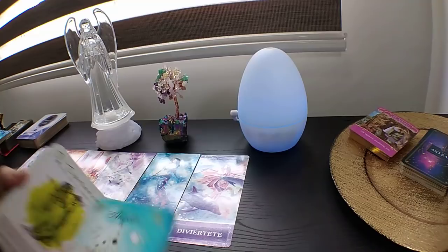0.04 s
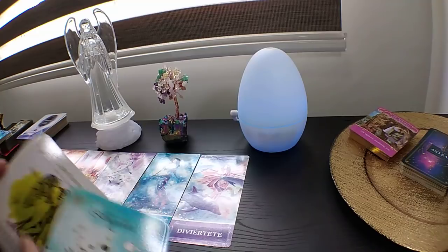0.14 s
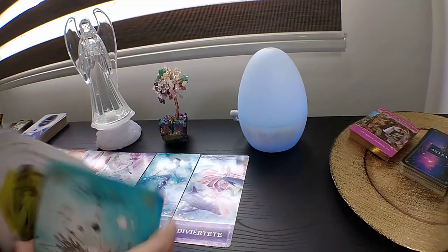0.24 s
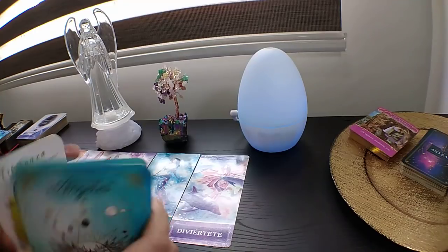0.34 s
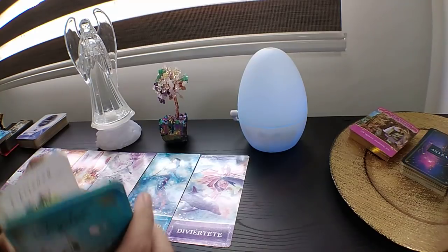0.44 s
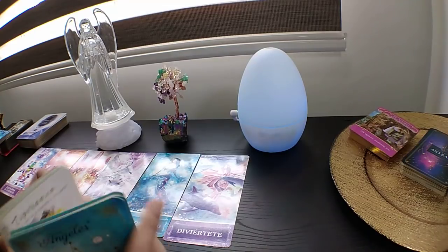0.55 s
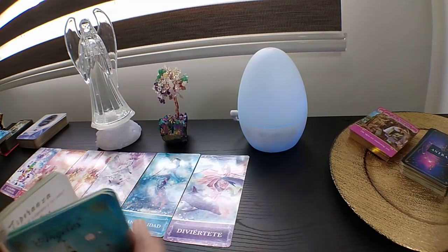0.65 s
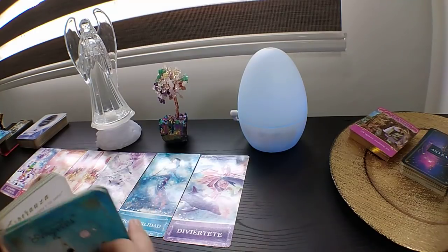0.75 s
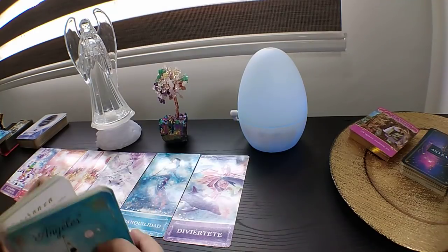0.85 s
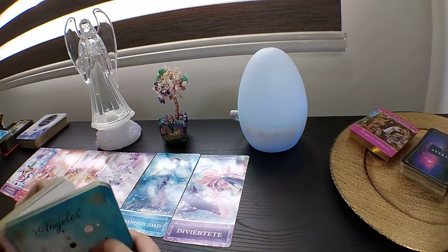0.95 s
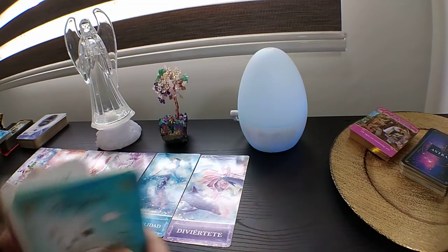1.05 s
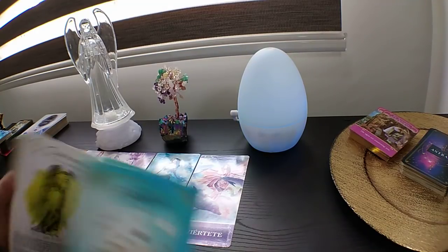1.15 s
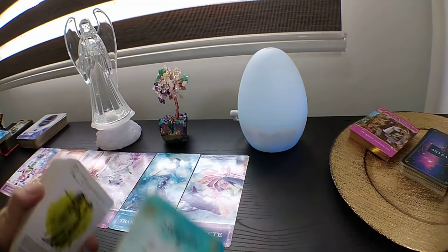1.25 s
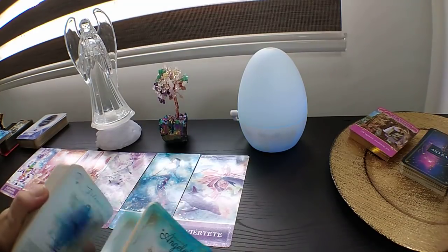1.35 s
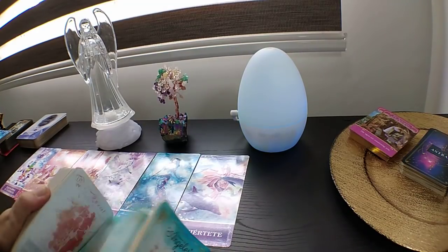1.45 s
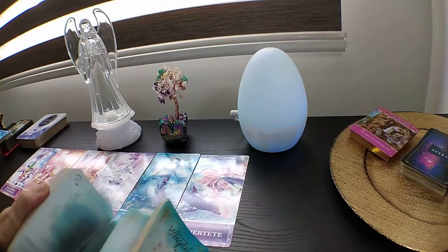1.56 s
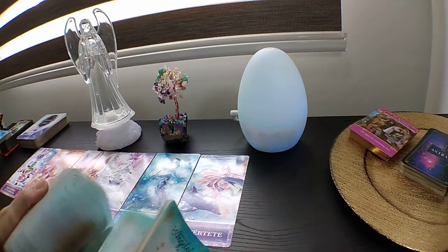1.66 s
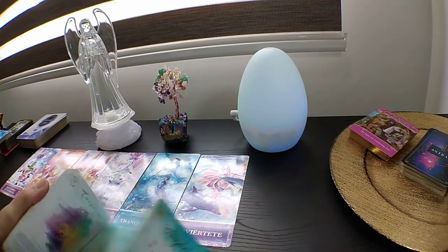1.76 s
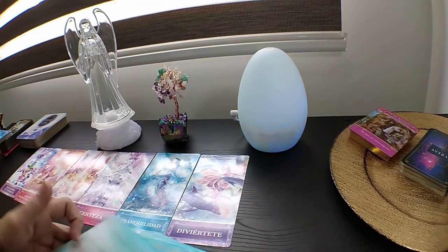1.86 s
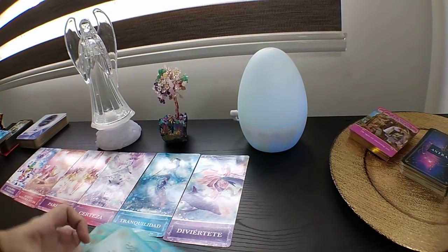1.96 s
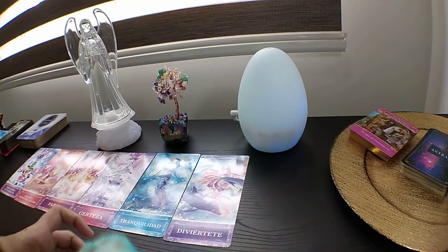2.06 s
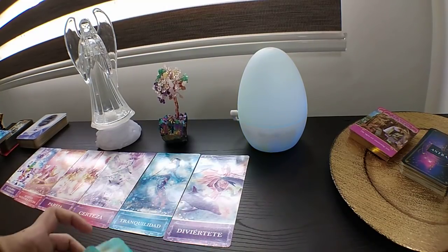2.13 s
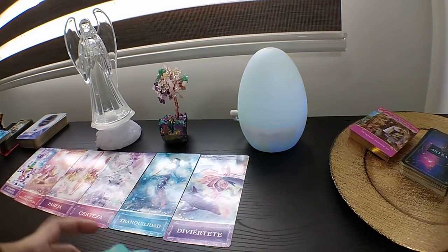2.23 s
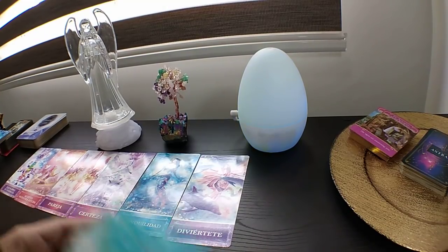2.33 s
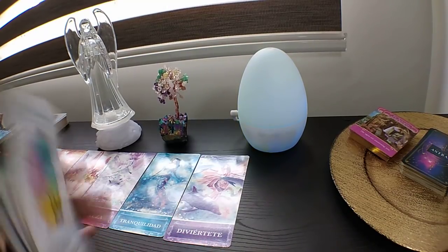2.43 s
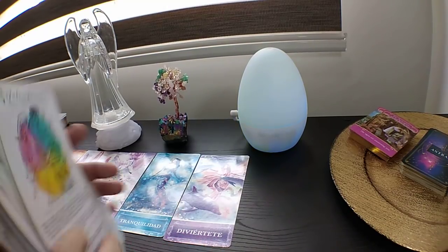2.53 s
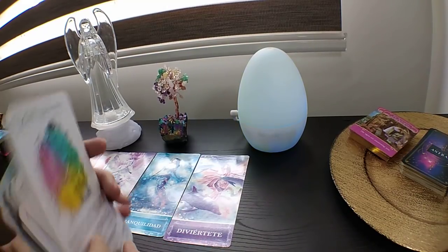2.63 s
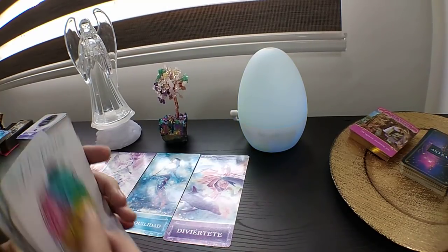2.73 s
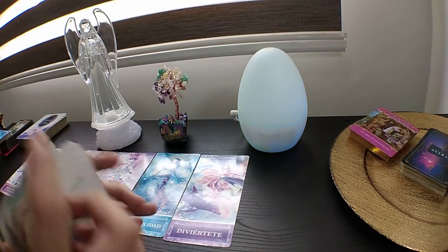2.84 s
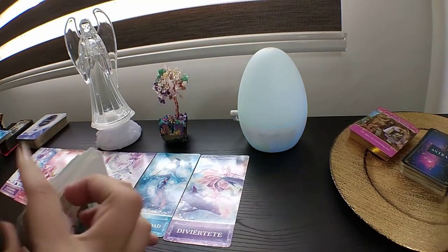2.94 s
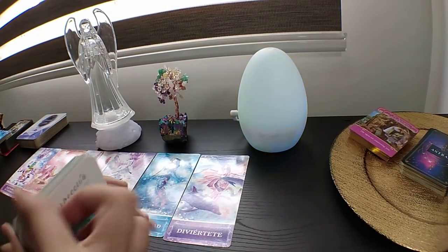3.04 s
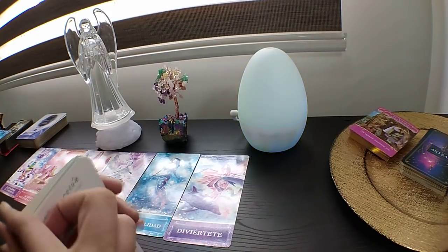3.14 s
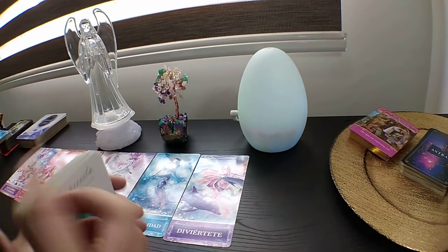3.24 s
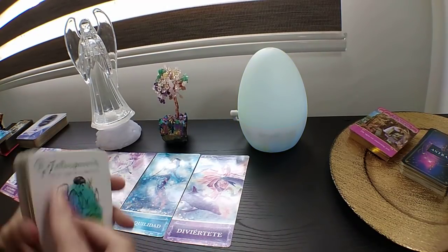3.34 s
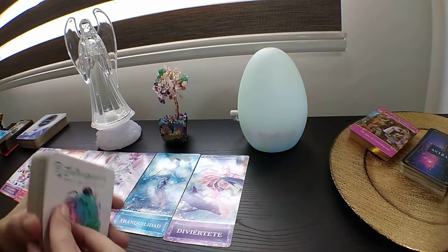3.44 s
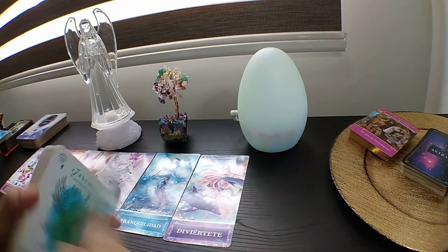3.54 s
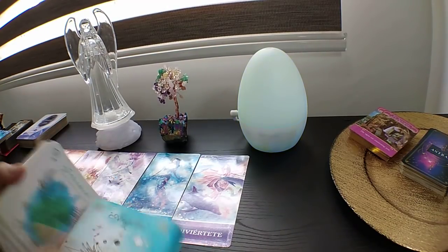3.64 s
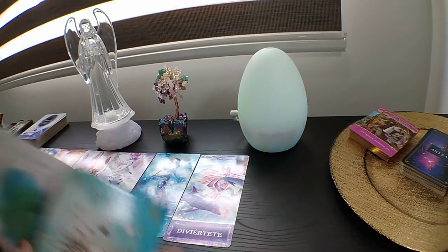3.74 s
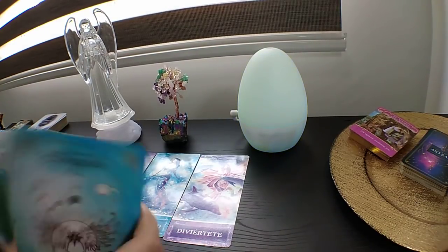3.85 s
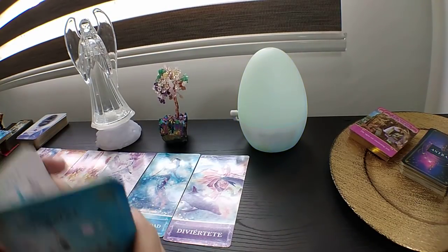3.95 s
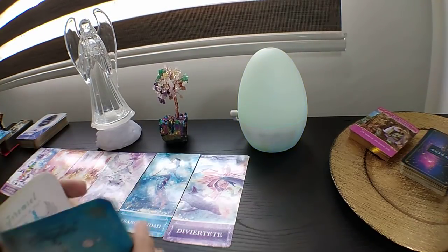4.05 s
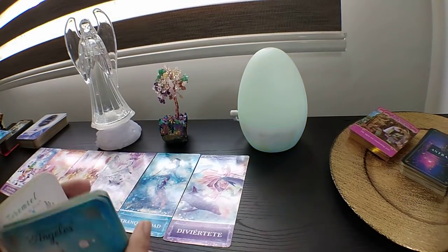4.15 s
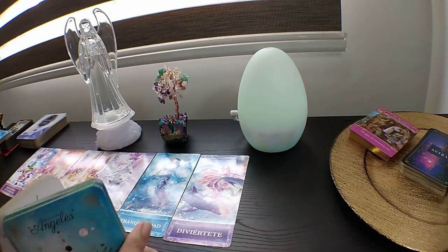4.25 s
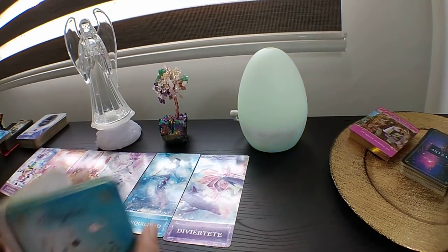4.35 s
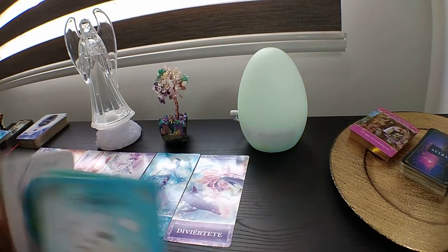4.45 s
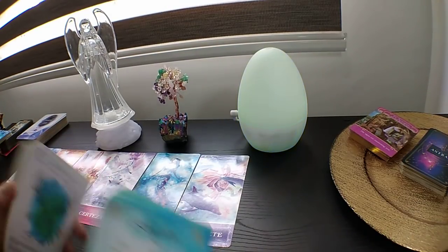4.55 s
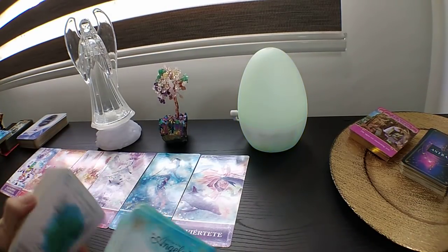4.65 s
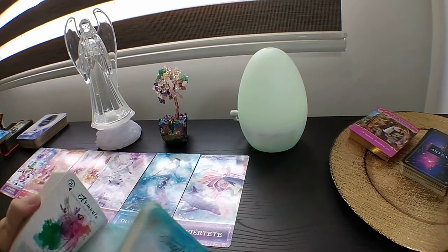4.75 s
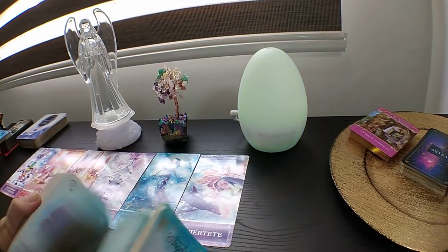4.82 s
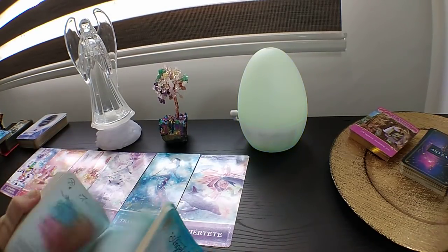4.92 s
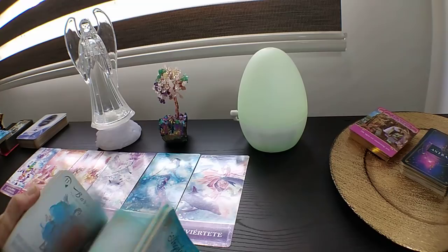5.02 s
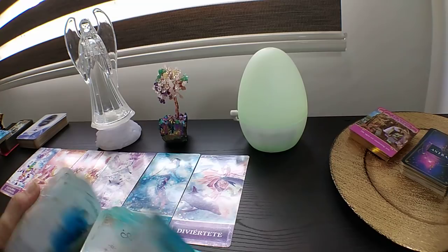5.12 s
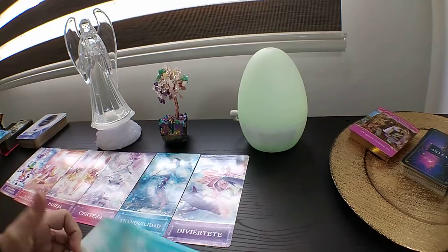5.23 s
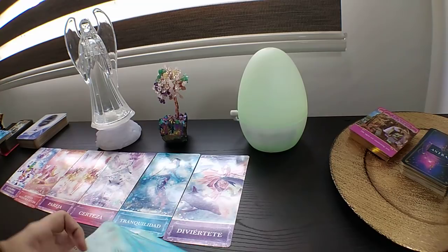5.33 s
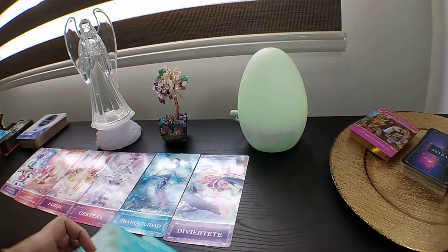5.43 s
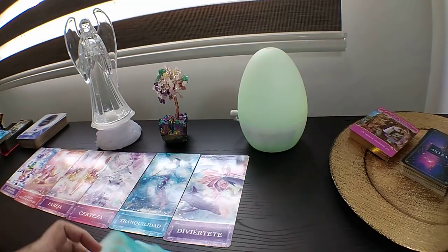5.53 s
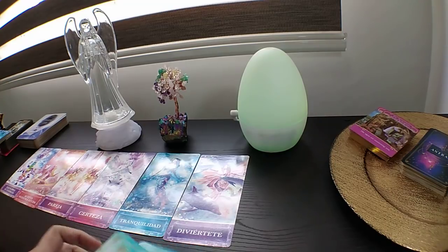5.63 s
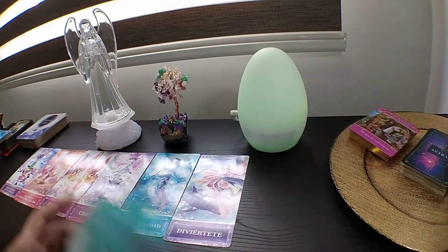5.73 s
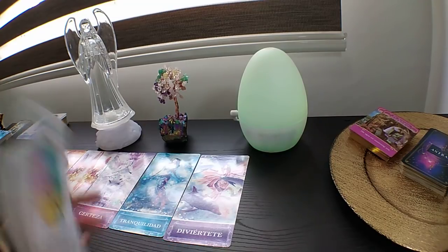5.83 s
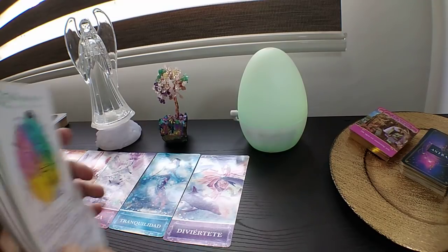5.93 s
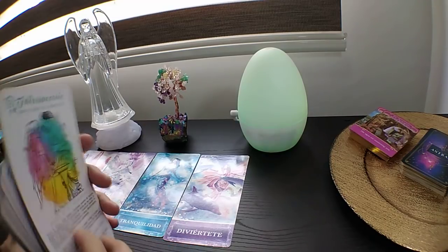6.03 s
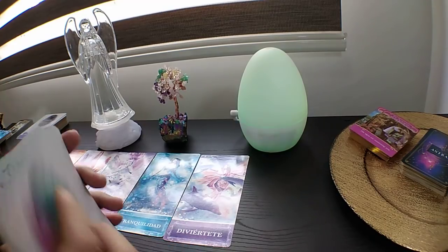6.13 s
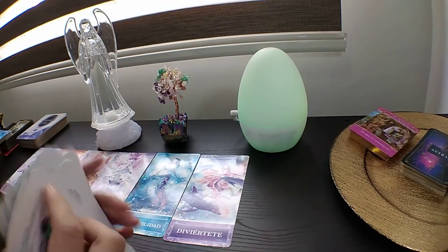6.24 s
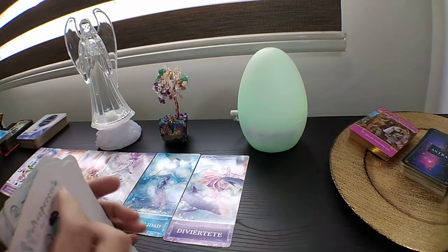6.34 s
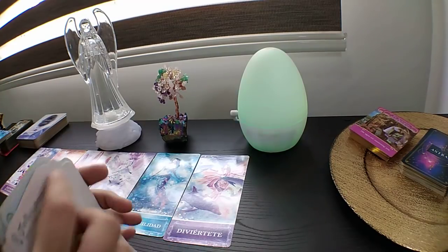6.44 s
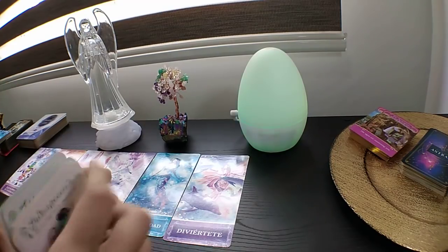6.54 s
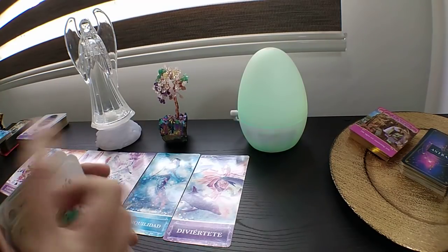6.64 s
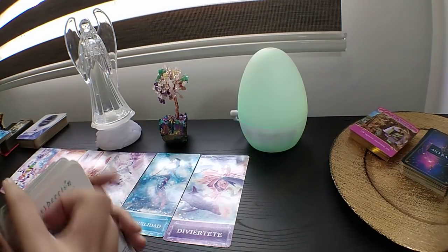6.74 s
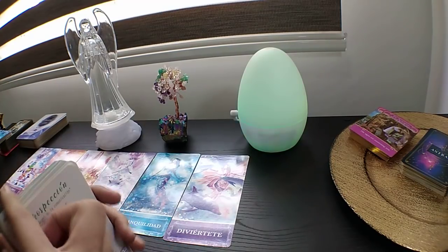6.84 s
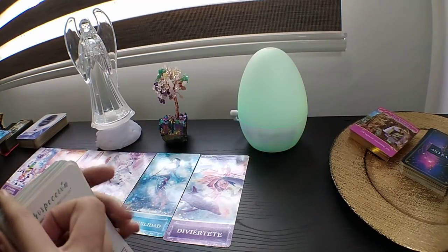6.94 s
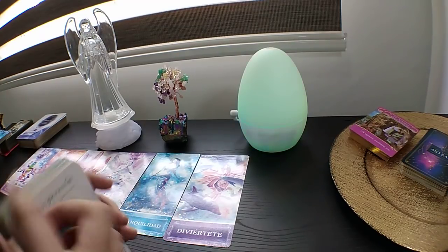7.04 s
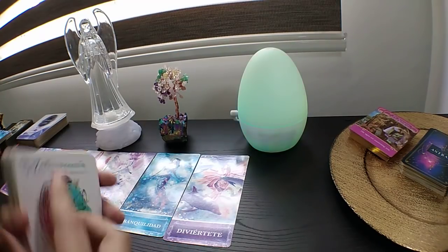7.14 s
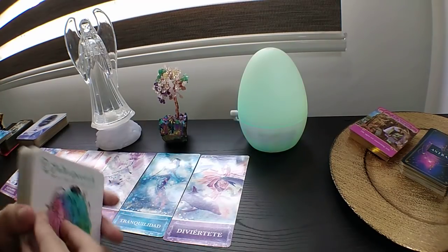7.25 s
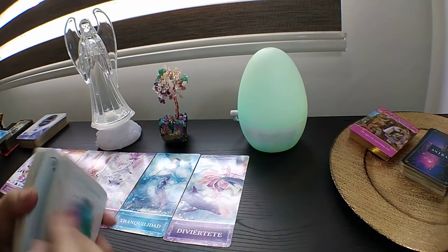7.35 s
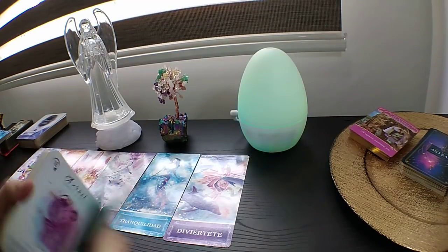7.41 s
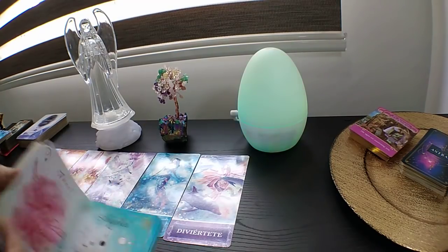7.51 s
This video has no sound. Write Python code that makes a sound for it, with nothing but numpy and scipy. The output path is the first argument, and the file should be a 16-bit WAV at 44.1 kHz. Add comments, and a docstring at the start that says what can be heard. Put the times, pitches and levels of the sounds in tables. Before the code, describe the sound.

Someone shuffles a deck of stiff cards by hand over a table. Packets slide with a soft rasp and clack in the palm. Twice the halves are pushed into each other with a hiss and a run of sharp snapping edges, then knocked square. More knocks and faint rubbing follow. The microphone is close, and the bare room rings briefly, with near silence between bursts.

```python
"""A deck of stiff cards is shuffled by hand over a table in a bare, ringing room.
Packets slide with stick-slip friction and clack together in the cupped palm. Twice the halves are
pushed into each other with a hiss and snapping edges, then knocked square.
A close two-port microphone hears it; a noise suppressor pulls down faint rustles and echo tails."""
import sys
import numpy as np
from scipy import signal
from scipy.fft import rfft, irfft, next_fast_len
from scipy.io import wavfile
from scipy.ndimage import uniform_filter1d, map_coordinates

SR = 44100
rng = np.random.default_rng(int(sys.argv[2]) if len(sys.argv) > 2 else 0)


def digitize_waveform(pressure):
    """Quantize a signal to 16-bit integers and store it at the path in sys.argv[1].

    Rows of a 2-D input are taken as channels; values are limited to [-1, 1].
    """
    field = np.atleast_2d(pressure).T
    bounded = np.clip(field, -1, 1)
    quanta = np.round(bounded * 32767).astype(np.int16)
    wavfile.write(sys.argv[1], SR, quanta)


N = 334278
TOP_HZ = 15500
T, HZ = np.arange(SR) / SR, np.fft.rfftfreq(SR, 1 / SR)  # time and FFT grids of one second


def amp(db):
    """Decibels to gain."""
    return 10 ** (np.asarray(db) / 20)


def unit(x):
    """x at rms 1."""
    return x / np.sqrt(np.mean(x ** 2) + 1e-20)


def along(points, hz):
    """Interpolate (Hz, value) points on a log frequency axis."""
    point_hz, values = np.transpose(points)
    return np.interp(np.log(hz + 1), np.log(point_hz + 1), values)


def peak(hz, centre_hz, half_width_hz):
    """Resonance curve of height 1."""
    return 1 / (1 + ((hz - centre_hz) / half_width_hz) ** 2)


def colour(parts, size=SR):
    """Gain per FFT bin: power sum of (spectrum, rms level in dB) parts."""
    hz = np.fft.rfftfreq(size, 1 / SR)
    return np.sqrt(sum((amp(db) * unit(amp(along(points, hz)))) ** 2 for points, db in parts))


def add(track, at_s, sound):
    """Mix a sound into the track."""
    start = max(round(at_s * SR), 0)
    track[:, start:start + sound.shape[1]] += sound[:, :max(N - start, 0)]


# Likeness of the two ports: (frequency [Hz], correlation [-1..1])
PORT_CORRELATION = [(60, 0.93), (200, 0.78), (400, 0.69), (750, 0.075), (1400, -0.2), (2500, 0.19),
                    (5000, -0.093)]
def noise(gain, size=SR):
    """Coloured noise at two ports: alike in the bass, nearly unrelated in the treble."""
    hz = np.fft.rfftfreq(size, 1 / SR)
    angle = np.arccos(along(PORT_CORRELATION, hz)) / 2
    mid, side = np.exp(2j * np.pi * rng.random((2, len(hz)))) * [np.cos(angle), np.sin(angle)]
    return irfft(np.array([mid + side, mid - side]) * gain, size) * np.sqrt(size)


# Room decay: (frequency [Hz], T60 [s])
ROOM_DECAY = [(210, 0.81), (560, 0.72), (1500, 0.68), (4000, 0.58), (10000, 0.54)]
# Diffuse tail: (frequency [Hz], gain [dB])
TAIL_SPECTRUM = [(60, -5.5), (120, -0.5), (600, -1.5), (1200, 1)]
def echo(gain, build_s=0.00043):
    """Diffuse room tail; the bass hangs longest."""
    hz, t, bands = signal.stft(noise(gain * amp(along(TAIL_SPECTRUM, HZ))), SR, nperseg=256)
    decay = amp(-60 * t / along(ROOM_DECAY, hz)[:, None])
    tail = signal.istft(bands * decay, SR, nperseg=256)[1][:, :SR]
    return tail * (1 - np.exp(-T / build_s))


def reverb(x):
    """The left channel through a stereo room tail of unit energy."""
    room = echo(1)
    return signal.fftconvolve(x[:1], room / np.linalg.norm(room[0]), axes=1)[:, :N]


def ripple(depth_db, size=SR, spacing_hz=170):
    """Random resonances: each grip bends the cards differently."""
    hz = np.fft.rfftfreq(size, 1 / SR)
    peaks = map_coordinates(rng.standard_normal(1024), [hz / spacing_hz], mode="mirror")
    return unit(amp(depth_db * peaks * hz / (hz + 900)))


def burst(gain, rise_s, size=SR):
    """Brief contact, card after card: random detail, energy set by the blow."""
    rises = np.arange(min(size, 2048)) / SR / rise_s
    force = (rises * np.exp(1 - rises)) ** 2
    rms = np.sqrt(np.mean(gain ** 2) * np.mean(force ** 2))
    return unit(noise(gain, size)[:, :len(force)] * force) * rms


def wobble(rate_hz):
    """Smooth random curve."""
    knots = rng.standard_normal(int(N * rate_hz / SR) + 4)
    return map_coordinates(knots, [np.arange(N) * rate_hz / SR])


def stick_slip(catch_db, grain_db):
    """Friction gain: clumps of tiny grains."""
    return unit(amp(catch_db * wobble(90) + grain_db * wobble(1100)))


def swing(length_s):
    """Stroke envelope: the hand speeds up, then slows."""
    return np.sin(np.pi * np.clip(T / length_s, 0, 1)) ** 0.54


# Bright crack and duller scrape of card edges: (frequency [Hz], density [dB])
CRACK_SPECTRUM = [(900, -42.5), (3000, -9.5), (5200, -1), (6500, -2), (8000, 3.5), (10000, -6),
                  (12000, -14.5), (14200, -23), (16000, -58)]
SCRAPE_SPECTRUM = [(400, -5), (900, -4.5), (1250, 0.5), (2100, -3), (3200, -5.5), (9000, -54.5)]
def tick(rise_s, ripple_db, size=512):
    """One edge flicks past another, in its own colour."""
    tone = colour([(CRACK_SPECTRUM, 0), (SCRAPE_SPECTRUM, -10)], size)
    return burst(tone * ripple(ripple_db, size, spacing_hz=458), rise_s, size)


def flicks(count, spread_db):
    """One second of ticks: cards drop past their neighbours."""
    out = np.zeros((2, N))
    for at_s, strength in zip(rng.random(count), rng.standard_normal(count)):
        add(out, at_s, tick(rise_s=0.00038, ripple_db=4) * amp(spread_db * min(strength, 2)))
    return unit(out[:, :SR])


# Low body of a flexed or struck packet: (frequency [Hz], density [dB])
THUMP_SPECTRUM = [(25, -50), (55, -21.5), (95, 2), (150, -4.5), (280, 0), (400, -10), (700, -26),
                  (1500, -73.5)]
# Resonances of a rubbed card: (frequency [Hz], half-width [Hz], boost [dB])
RUB_MODES = [(1350, 38, 5), (1864, 270, 7), (2870, 73, 6.5)]
# Finger strokes: (start [s], end [s], level [dB], relative edge scrape [dB])
SLIDES = [(0.039, 0.12, -48, -8.5), (0.216, 0.27, -66.5, 10.5), (1.335, 1.54, -49, -1.5),
          (2.244, 2.376, -46.5, -3.5), (2.381, 2.633, -46.5, -14.5), (2.621, 2.886, -48.5, -4),
          (2.957, 3.16, -48, -17), (3.611, 3.963, -68, 6.5), (4.6, 4.863, -54, 1.5),
          (5.58, 5.99, -50.5, -8), (5.931, 6.16, -42, -16), (6.555, 6.616, -41.5, -0.5),
          (6.717, 6.968, -56.5, 12.5), (7.523, 7.622, -41, -20)]
def slides():
    """Faces stick and slip under flicking edges; more scrape gives brighter hiss and more flex rumble."""
    rub = np.zeros((2, N))
    ticks = flicks(count=220, spread_db=-1.5) * amp(-6)
    octaves = np.log2(np.clip(HZ, 4000, 9000) / 7000)
    singing = amp(sum(db * peak(HZ, hz, width_hz) for hz, width_hz, db in RUB_MODES))
    for start, end, db, edge_db in SLIDES:
        tone = colour([(CRACK_SPECTRUM, -2), (SCRAPE_SPECTRUM, edge_db - 5),
                       (THUMP_SPECTRUM, edge_db - 12)])
        friction = noise(tone) + np.roll(ticks, rng.integers(SR), axis=1)
        tilt_db = (6.5 + 0.52 * edge_db) * octaves * (HZ / (HZ + 2000)) ** 2
        hiss = irfft(rfft(friction) * singing * amp(tilt_db), SR)
        add(rub, start, amp(db) * swing(end - start) * hiss)
    rub *= stick_slip(catch_db=2, grain_db=2.5)
    return rub * amp(-3) + reverb(rub)


# Edges snapping free: (time [s], level [dB], left minus right [dB])
EDGE_SNAPS = [(0.092, -43, -23.5), (0.227, -45, -7), (1.141, -55.5, -18), (1.449, -32, -7),
              (1.494, -26.5, -5), (1.549, -15, -1), (1.559, -18.5, -2.5), (1.624, -9.5, 3.5),
              (1.685, -15, -5.5), (1.694, -17, -6.5), (1.778, -17.5, 0), (1.784, -15, -4),
              (1.909, -15, 4.5), (1.94, -23.5, 4), (1.973, -22.5, -2), (2.29, -32, -4),
              (2.448, -28.5, -6.5), (2.876, -24, -1.5), (3.548, -43.5, -5), (3.709, -42.5, 5),
              (3.799, -39.5, -5), (4.583, -29.5, 1.5), (4.796, -28, 9.5), (4.82, -26.5, 11),
              (4.834, -26.5, -4.5), (4.852, -15.5, 13), (4.856, -13.5, 12.5), (4.938, -11.5, 9),
              (5.049, -17.5, -7.5), (5.076, -12, -2.5), (5.097, -14.5, -4), (5.192, -24.5, -11),
              (5.244, -19, -1.5), (5.324, -18, -4), (5.35, -25.5, 11.5), (6.27, -19, -1),
              (7.387, -55, 10.5), (7.526, -32.5, 1)]
def snaps(rise_s=0.0012, spread_s=0.0036, bounce_s=0.0017, ripple_db=3, size=2048):
    """An edge cracks free and the sound bounces off the table; four neighbours slip after it."""
    direct, to_room = np.zeros((2, N)), np.zeros((2, N))
    edge = colour([(CRACK_SPECTRUM, -3), (SCRAPE_SPECTRUM, -11)], size)
    sheen_db = 5 * np.fft.rfftfreq(size, 1 / SR) / TOP_HZ
    for at_s, db, pan_db in EDGE_SNAPS:
        crack = burst(edge * amp(db + sheen_db) * ripple(ripple_db, size), rise_s, size)
        crack *= amp(-2.3) * amp([[pan_db / 2], [-pan_db / 2]])
        # arrivals from many sides smear the room's share
        add(to_room, at_s, burst(edge * amp(db), spread_s, size) * np.sqrt(rise_s / spread_s))
        add(direct, at_s, crack)
        add(direct, at_s + bounce_s, 0.82 * crack)
        for late_s in rng.exponential(0.015, size=4):
            add(direct, at_s + late_s, tick(rise_s, ripple_db) * amp(db - 12))
    return direct + reverb(to_room) * amp(1.5)


# Gliding faces: (frequency [Hz], density [dB])
RASP_SPECTRUM = [(1300, -29), (2000, -10), (2900, -23.5), (3800, -17), (4250, -3), (4600, -5), (5400, -5.5),
                 (8700, -9.5), (13000, -33.5)]
# Packets drawn out: (start [s], end [s], level [dB])
PACKET_PULLS = [(0.333, 0.507, -49), (3.973, 4.133, -55.5)]
def pulls():
    """A packet glides slowly out of the deck with a soft rasp."""
    rasp = np.zeros((2, N))
    for start, end, db in PACKET_PULLS:
        add(rasp, start, swing(end - start) * noise(colour([(RASP_SPECTRUM, db)])))
    rasp *= stick_slip(catch_db=2, grain_db=4)
    return rasp * amp(-4) + reverb(rasp) * amp(-3)


# Bending modes of the stack: (frequency [Hz], level [dB], T60 [s])
STACK_MODES = [(1079, -6, 0.059), (1473, 2.5, 0.06), (2065, 3.5, 0.031), (2460, -2.5, 0.028)]
def deck_ring(packet_hz, rise_s, reach_hz=500, scatter_db=1.5):
    """The stack rings like a wood block, most near the struck packet's resonance."""
    t = T[:SR // 8]
    hz, db, t60_s = np.transpose(STACK_MODES)[:, :, None]
    gain = amp(db + scatter_db * rng.standard_normal(hz.shape)) * np.sqrt(peak(hz, packet_hz, reach_hz))
    phase = 2 * np.pi * rng.random(hz.shape) + 0.5 * rng.standard_normal((2,) + hz.shape)
    modes = gain * amp(-60 * t / t60_s) * np.sin(2 * np.pi * hz * t + phase)
    return modes.sum(axis=1) * (1 - np.exp(-t / rise_s))


# Low room modes: (frequency [Hz], level [dB])
STANDING_WAVES = [(108, -31.5), (142, -25), (181, -23), (199, -25), (251, -21.5), (309, -23), (467, -24),
                  (508, -28.5), (567, -27), (637, -25), (770, -28.5), (885, -26), (1067, -23)]
def standing_waves(tone, scatter_db=5):
    """A blow rings the room's modes; higher ones differ more in phase between the ports."""
    hz, db = np.transpose(STANDING_WAVES)
    gain = np.interp(hz, HZ, tone) * amp(db + scatter_db * rng.standard_normal(len(hz)))
    phase = 2 * np.pi * rng.random(len(hz)) + rng.standard_normal((2, len(hz))) * hz / 900
    ringing = np.exp(2j * np.pi * hz[:, None] * T) * amp(-60 * T / along(ROOM_DECAY, hz)[:, None])
    return ((gain * np.exp(1j * phase)) @ ringing).real


# Air in the hand, card on card, edge click: (frequency [Hz], density [dB])
HOLLOW_SPECTRUM = [(120, -59), (330, 0.5), (480, 0), (680, 0), (950, -5), (1600, -20), (3000, -73)]
CLACK_SPECTRUM = [(200, -68.5), (750, -15), (1100, 3.5), (1500, 6.5), (2200, 4), (2800, 0), (3700, -10.5),
                  (12000, -75)]
EDGE_SPECTRUM = [(1000, -48.5), (3000, -3.5), (5000, 4), (8200, 2.5), (10000, -4.5), (12000, -29.5),
                 (16000, -39)]
# Packet blows: (time [s], card level [dB], palm level [dB], packet resonance [Hz], hand resonance [Hz])
PACKET_KNOCKS = [(.549, -19, -23, 2900, 393), (0.649, -31.5, -33.5, 1560, 505),
                 (0.846, -31, -43.5, 1930, 450), (.853, -25, -33.5, 2300, 564),
                 (1.496, -42, -29.5, 1130, 410), (1.546, -26, -30.5, 1710, 276),
                 (1.973, -32, -38, 2180, 293), (2.637, -36.5, -26.5, 1513, 610),
                 (2.848, -36, -25, 1480, 490), (2.879, -11, -29, 2100, 680), (2.989, -17, -28.5, 1680, 252),
                 (3.123, -31, -30.5, 1420, 242), (3.258, -25, -37.5, 2075, 300),
                 (4.103, -19.5, -20, 1090, 90), (4.114, -17.5, -24.5, 1356, 130),
                 (4.18, -23.5, -35.5, 1396, 181.6), (4.194, -22, -35, 1650, 180),
                 (4.798, -36, -32, 1100, 270), (4.853, -27, -30.5, 1820, 274),
                 (5.08, -22.5, -40.5, 1930, 700), (5.146, -25.5, -40.5, 1980, 570),
                 (6.035, -60, -27.5, 1100, 450), (6.092, -23.5, -45, 2220, 500),
                 (6.143, -24.5, -30.5, 1480, 387), (6.229, -19.5, -19.5, 1888, 610),
                 (6.238, -13, -16, 1260, 662), (6.25, -17.5, -16.5, 1400, 390),
                 (6.594, -25.5, -34, 1750, 440), (6.743, -31.5, -40.5, 1500, 265),
                 (6.799, -27.5, -36, 2110, 313), (7.064, -56.5, -50, 1500, 523)]
def knocks(lead_s=0.0012, ring_t60_s=0.21, click_hz=3300):
    """Packets clack in the cupped hand and ring briefly; more card and less palm shortens the contact."""
    out = np.zeros((2, N))
    click_db = 5 / (1 + (click_hz / (HZ + 1)) ** 4)
    for at_s, card_db, palm_db, packet_hz, cup_hz in PACKET_KNOCKS:
        hardness_db = card_db - palm_db
        contact_s = 0.0026 * np.clip(np.exp(0.062 * (9.5 - hardness_db)), 0.85, 2)
        tight_db = -6 * max(np.log2(cup_hz / 300), 0)  # a tighter cup thumps less
        tone = colour([(THUMP_SPECTRUM, palm_db + tight_db),
                       (HOLLOW_SPECTRUM, palm_db + 0.24 * hardness_db),
                       (CLACK_SPECTRUM, card_db - 2), (EDGE_SPECTRUM, card_db - 16)])
        bending = peak(HZ, packet_hz, 200)
        cupped = peak(HZ, cup_hz, 0.2 * cup_hz)
        tone *= amp(5 * bending + 6 * cupped) * ripple(depth_db=2.5)
        clack = burst(tone * amp(4 * bending + click_db), contact_s)
        boost_db = 0.28 * hardness_db
        add(out, at_s - lead_s, clack * amp(max(boost_db, 0) - 6))
        add(out, at_s, deck_ring(packet_hz, contact_s / 2) * amp(card_db + boost_db - 7))
        ring = noise(tone) * amp(-10 - 60 * T / ring_t60_s)
        room = (echo(tone) + standing_waves(tone)) * amp(-8.5)
        add(out, at_s, (ring + room) * (1 - np.exp(-T / contact_s / 2)))
    return out


# Heel of the hand on the deck: (frequency [Hz], density [dB])
SKIN_SPECTRUM = [(25, -31), (60, -7.5), (130, -2), (230, -6), (330, -3), (700, -35), (1500, -71.5)]
# The hand takes hold: (time [s], level [dB])
HAND_PATS = [(1.327, -32.5), (2.329, -46.5), (2.638, -34), (2.929, -28.5), (3.8, -54.5), (4.583, -39),
             (4.716, -34.5), (5.461, -36), (5.526, -26), (5.536, -26)]
def pats(contact_s=0.0022, ring_t60_s=0.09):
    """Skin on card: a dull thump, hardly any clack."""
    out = np.zeros((2, N))
    tone = colour([(SKIN_SPECTRUM, 0), (HOLLOW_SPECTRUM, -20),
                   (CLACK_SPECTRUM, -21), (EDGE_SPECTRUM, -18)])
    for at_s, db in HAND_PATS:
        add(out, at_s, burst(tone, contact_s) * amp(db - 3))
        ring = noise(tone) * amp(-4 - 60 * T / ring_t60_s)
        room = (echo(tone) + standing_waves(tone)) * amp(-9)
        add(out, at_s, (ring + room) * (1 - np.exp(-T / contact_s)) * amp(db))
    return out


# Halves pushed together: (start [s], end [s], level [dB])
CARD_CASCADES = [(1.478, 2.072, -32), (4.818, 5.43, -32)]
def cascades(attack_s=0.018, release_s=0.24):
    """Falling cards gather speed, flow and run out: flicks over hiss and flex rumble."""
    hiss, flutter = np.zeros((2, N)), np.zeros((2, N))
    tone = colour([(CRACK_SPECTRUM, -8), (SCRAPE_SPECTRUM, -11)])
    for start, end, db in CARD_CASCADES:
        flow = amp(db) * np.clip(np.minimum(T / attack_s, (end - start - T) / release_s), 0, 1)
        add(hiss, start, flow * noise(tone * ripple(depth_db=3)))
        flexing = noise(colour([(THUMP_SPECTRUM, -12)]))
        ticks = flicks(count=55, spread_db=5.5) * amp(-3.5)
        add(flutter, start, flow * (flexing + ticks))
    cards = hiss * stick_slip(catch_db=8, grain_db=4) + flutter
    return cards * amp(-1.5) + reverb(cards)


# Room hush: (frequency [Hz], density [dB])
HUSH_SPECTRUM = [(100, 0.5), (600, -18), (4000, -8.5), (8000, -8.5), (16000, -34)]
def scene():
    """The cards over the faint hush of the room."""
    cards = knocks() + pats() + snaps() + cascades() + pulls() + slides()
    return cards + noise(colour([(HUSH_SPECTRUM, -73)], N), N)


# Suppressor threshold: (frequency [Hz], level [dB])
NOISE_THRESHOLD = [(290, -79.5), (480, -70.5), (1600, -76), (8000, -101.5), (13000, -103)]
def suppress(x, depth_db=-16, steepness=1.8):
    """Each band is turned down as its power sinks to the threshold."""
    hz, _, bands = signal.stft(x, SR, nperseg=512)
    power = np.mean(np.abs(bands) ** 2, axis=0)
    power = uniform_filter1d(power, size=2, axis=0)  # over frequency
    power = np.abs(uniform_filter1d(power, size=6, axis=1))  # over time
    margin = (power / amp(along(NOISE_THRESHOLD, hz))[:, None] ** 2) ** steepness
    gain = np.maximum(margin / (1 + margin), amp(depth_db))
    return signal.istft(bands * gain, nperseg=512)[1][:, :N]


# Port colour: (frequency [Hz], left minus right [dB])
PORT_BALANCE = [(250, 0.5), (2200, 1), (4500, -2), (6000, -10), (8000, 5.5), (12000, 2.5)]
def record(dry, low_cut_hz=53):
    """Port colour, low cut, noise suppression, clipping, band limit."""
    size = next_fast_len(N + 4096)
    hz = np.fft.rfftfreq(size, 1 / SR)
    ports = amp(np.outer([0.5, -0.5], along(PORT_BALANCE, hz)))
    heard = irfft(rfft(dry, size) * ports, size)[:, :N]
    heard = signal.sosfilt(signal.butter(4, low_cut_hz, "high", fs=SR, output="sos"), heard)
    clipped = np.clip(suppress(heard), -1, 1)
    return irfft(rfft(clipped, size) * (hz < TOP_HZ), size)[:, :N]


dry = scene()
out = record(dry)
digitize_waveform(out)
```